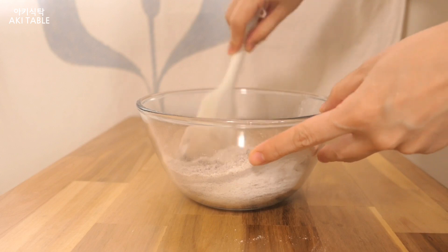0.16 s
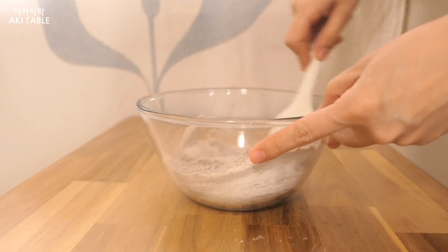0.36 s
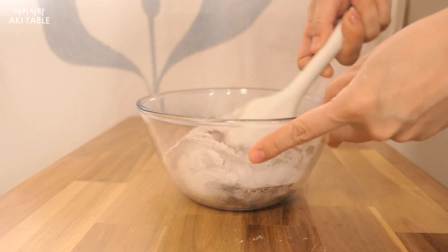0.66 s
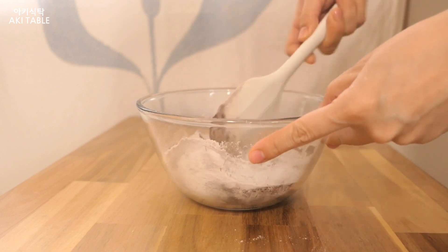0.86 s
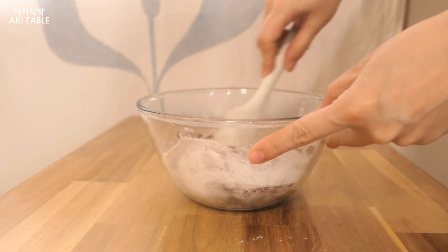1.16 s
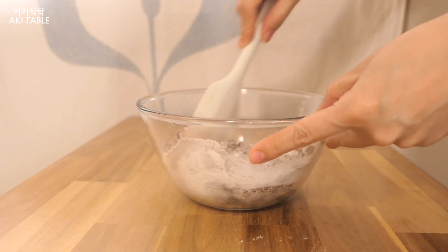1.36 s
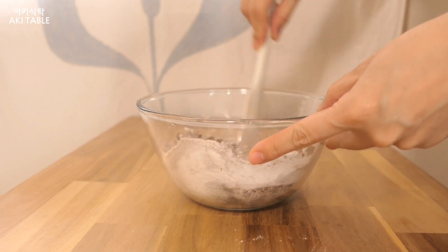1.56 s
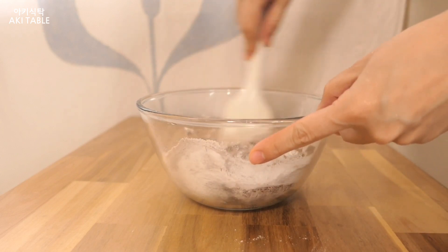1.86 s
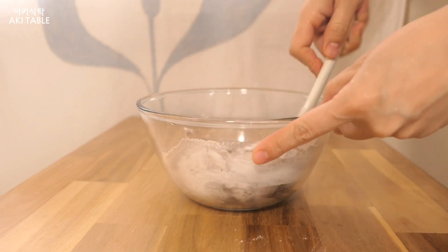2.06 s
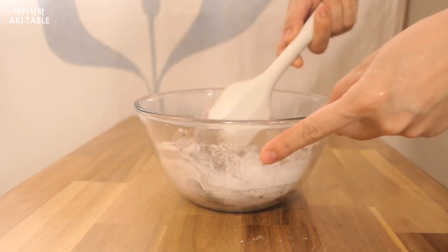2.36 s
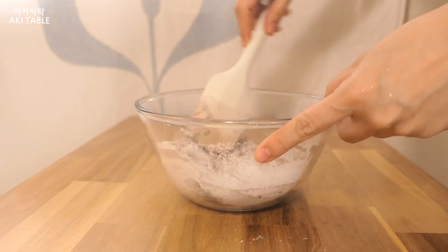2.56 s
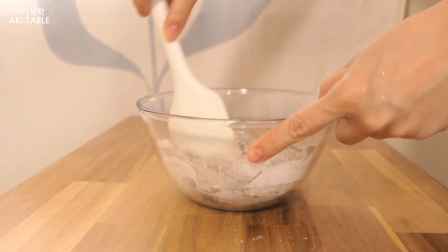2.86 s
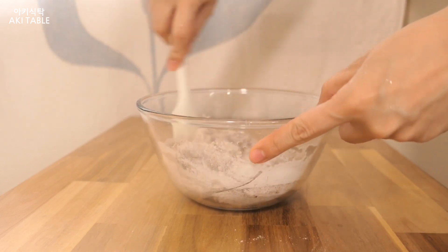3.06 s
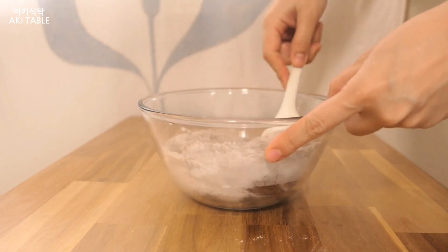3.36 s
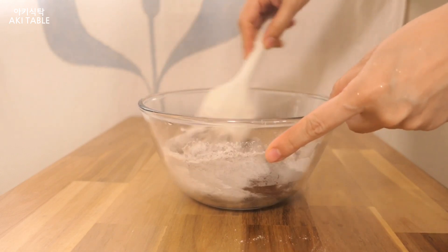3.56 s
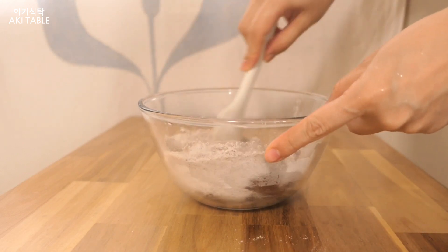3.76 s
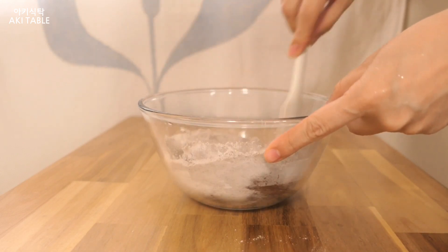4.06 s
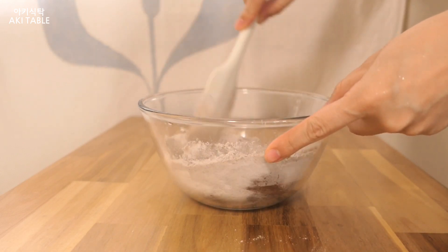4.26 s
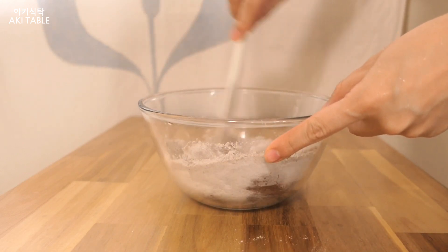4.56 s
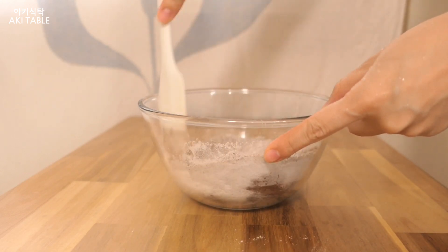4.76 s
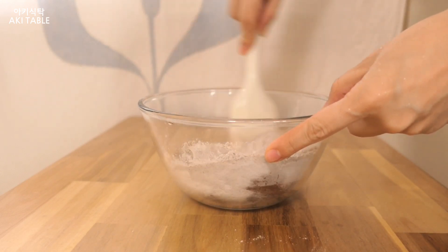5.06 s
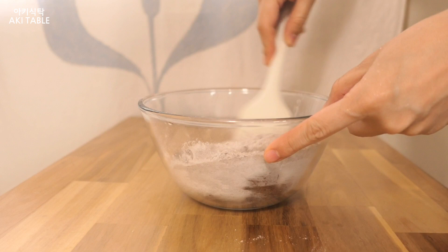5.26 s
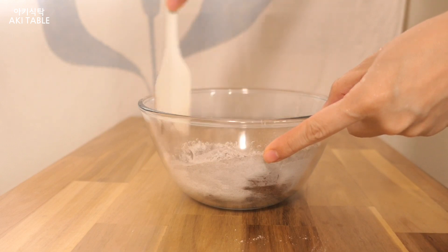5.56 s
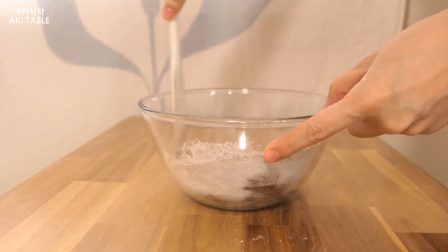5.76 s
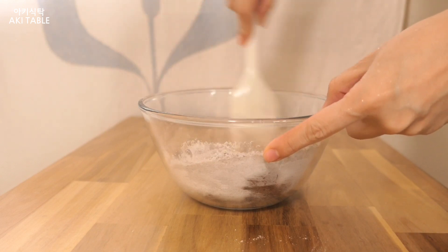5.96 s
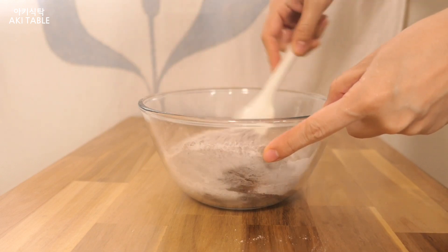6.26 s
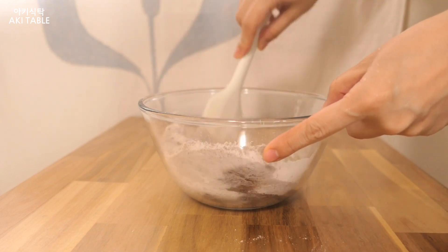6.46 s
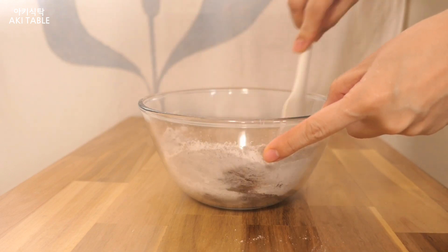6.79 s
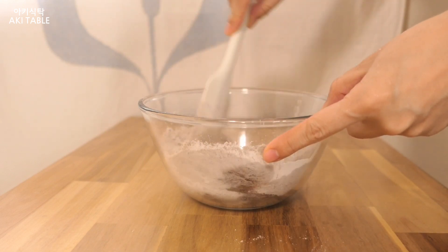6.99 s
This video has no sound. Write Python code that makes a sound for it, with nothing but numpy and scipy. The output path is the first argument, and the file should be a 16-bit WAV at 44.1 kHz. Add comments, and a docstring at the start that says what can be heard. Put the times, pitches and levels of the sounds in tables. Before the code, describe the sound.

A flexible blade pushes powder around a glass bowl on a wooden table, heard closely in stereo with short room echoes. First come a damped glassy knock and low thumps, then a cluster of rubbing scrapes and little clicks, another knock at three seconds, and a quieter spell. Brighter, dusty rasps follow towards the end, fading to gentle strokes above faint low rumble and slight hiss.

```python
"""In a small quiet kitchen, a silicone spatula folds dry powder in a glass bowl held on a wooden table.
The powder hisses and the blade rubs the glass: random tiny slips, coloured and swelling with each stroke.
Now and then the bowl rocks and knocks on the wood: sums of dying tones, kept short and hollow by a hand.
Small snaps and clicks stand out, and a low room rumble, made of coloured noise, lies under it all."""
import sys
import numpy as np
from scipy import signal
from scipy.fft import rfft, irfft
from scipy.io import wavfile

SR = 44100
rng = np.random.default_rng(int(sys.argv[2]) if len(sys.argv) > 2 else 0)


def pcm_store(signal):
    """Save signal as 16-bit PCM."""
    levels = np.round(np.clip(np.atleast_2d(signal), -1, 1) * 32767)
    wavfile.write(sys.argv[1], SR, levels.astype(np.int16).T)


N = 314433
TIME = np.arange(N) / SR  # seconds
RING_TIME = TIME[:SR // 2]  # the half second given to each struck sound

# All levels in dB are relative: the mix adds its own gains.
# The blade sweeps through the powder. Each row: moment of fastest motion in seconds, rise in seconds,
# fall in seconds, then levels in dB of sliding powder, rubbing on glass, shove on the heap, fine dust.
STROKES = [(0.13, 0.14, 0.12, -82, -75, -53, -84), (0.32, 0.084, 0.17, -75, -65.5, -60, -73),
           (1.10, 0.068, 0.084, -78.5, -66.5, -56, -80), (1.401, 0.017, 0.031, -73.5, -62, -39, -79),
           (1.74, 0.14, 0.04, -77, -66.5, -53, -78), (1.852, 0.038, 0.062, -70.5, -60, -50, -84),
           (2.01, 0.13, 0.14, -77.5, -69, -59.5, -73), (2.51, 0.044, 0.057, -80, -83, -63, -88),
           (2.83, 0.094, 0.17, -75.5, -72, -57, -75), (3.11, 0.022, 0.093, -70.5, -57, -46, -71),
           (3.64, 0.088, 0.074, -76, -69, -57, -75), (4.04, 0.063, 0.075, -84, -74, -54.5, -78),
           (4.33, 0.051, 0.12, -90, -79, -60, -78), (4.685, 0.043, 0.029, -82, -72, -56, -64),
           (4.785, 0.078, 0.071, -69.5, -75, -68, -65), (4.925, 0.033, 0.023, -67.5, -85, -63, -69),
           (4.965, 0.022, .03, -69, -68, -57.5, -70), (5.03, 0.15, 0.068, -74, -70.5, -53.5, -74),
           (5.645, 0.093, 0.032, -70.5, -81, -66, -65), (5.72, 0.046, 0.047, -67, -81, -68, -67),
           (5.82, 0.043, 0.02, -68, -77, -56, -68), (5.874, 0.05, 0.11, -69, -92, -51, -66),
           (6.04, 0.062, 0.093, -77, -72, -51, -82), (6.40, 0.026, 0.094, -75.5, -73, -55, -85),
           (6.74, 0.042, 0.044, -83, -75, -54.5, -86), (7.12, 0.066, 0.1, -82, -75.5, -53.5, -80)]
# The blade rasps along the wall; near 7.9 kHz the glass sings, above 12 kHz fine dust fizzes.
# Each row: moment of firmest contact in seconds, rise in seconds, fall in seconds, level in dB,
# resonance in Hz, width of one filter pass in Hz, glide in octaves per second.
RASPS = [(1.9, 0.023, .025, -71.5, 3000, 2000, -2), (1.845, 0.031, 0.031, -64, 2400, 1600, -8),
         (2.92, 0.032, 0.028, -71.5, 2450, 1400, -2), (5.2, .025, 0.03, -76, 3200, 1300, -1),
         (4.775, 0.064, 0.042, -76, 2860, 1200, -3), (4.79, .08, 0.09, -71.5, 7950, 300, 0.5),
         (4.77, 0.073, 0.28, -74, 13400, 3800, -1), (4.917, .009, 0.014, -66, 6400, 1800, 2),
         (4.955, 0.013, .025, -65.5, 5900, 1200, 0), (4.975, 0.034, 0.12, -68.5, 2900, 1300, -3),
         (5.65, .05, .04, -72, 7900, 260, 0.5), (5.72, 0.086, 0.026, -72, 12000, 4800, 0),
         (5.87, 0.065, .13, -76, 12700, 3200, 0), (5.66, 0.1, 0.15, -75, 1420, 74, 0),
         (6.2, 0.058, 0.037, -79, 3100, 600, 1), (5.745, .08, .06, -78.5, 3920, 140, 0),
         (5.74, 0.047, 0.064, -80, 2520, 170, -0.5), (5.868, .018, 0.016, -65, 5560, 1200, -3),
         (5.90, 0.035, .04, -69, 8000, 298, -0.5), (5.885, 0.034, 0.063, -67, 3160, 1200, -1),
         (5.885, 0.025, .05, -61.5, 550, 240, -2), (6.04, 0.033, 0.027, -60, 660, 370, 0),
         (5.995, 0.035, 0.1, -71.5, 2350, 1100, -0.5), (6.17, 0.07, 0.14, -84, 2400, 760, -1),
         (6.40, 0.027, 0.04, -74, 3300, 940, -8)]
# Colours of the sliding powder, fine dust, rubbing blade, cracking crumbs and shoved heap.
# Each row: frequency in Hz, level in dB per Hz.
POWDER_COLOUR = [(1000, -41), (2500, 2.5), (3700, -2.5), (4300, -2.5), (4700, -19), (5100, 5), (7000, 4),
                 (9500, 0.5), (12000, -11), (15000, -21)]
DUST_COLOUR = [(2000, -32), (5000, -13), (7000, -4.5), (8000, -1), (10000, 4), (13000, -8), (15000, -8)]
RUB_COLOUR = [(500, -8.5), (830, 7), (1200, -1), (1550, 5.5), (1900, -1), (2450, -5.5), (3300, -16),
              (4600, -20.5), (8000, -35)]
GRIT_COLOUR = [(1200, -10), (2500, 1), (3800, 6), (4600, 0), (6000, -6), (9000, -7), (13000, -3),
               (15000, -13)]
HEAP_COLOUR = [(60, -39), (130, 10), (220, 1.5), (280, 15), (380, 4.5), (520, 2), (640, -9), (820, -9),
               (1200, -22), (2500, -48)]
# The bowl knocks on the table. Each row: start in seconds, table thud in dB, bowl ring in dB,
# contact hardness as the ring's upper limit in Hz, glass click in dB, damping by the hand (1 = usual).
KNOCKS = [(0.24, -35, -47, 703, -61.5, 0.87), (0.3230, -26.5, -22.5, 940, -49.5, 1.04),
          (0.3903, -39, -1.5, 6060, -39, 1.07), (0.3971, -49, -13, 960, -58, 3.7),
          (1.0954, -18, -16, 192, -72, 1), (1.3767, -17, -11.5, 215, -73, 1.02),
          (1.3946, -28, -15.5, 360, -51, 1.53), (3.095, -47, -35, 202, -75, 2.5),
          (3.0976, -22, -11, 780, -38.5, 1.55), (3.635, -41, -38, 500, -66, 0.99),
          (3.99, -41, -40, 503, -73, 1.2), (5.041, -68, -36, 700, -75, 1.45),
          (5.492, -45.5, -32.5, 700, -68, 0.89)]
# Small snaps of the blade or cracking crumbs; near 3.099 s the bowl's glass clicks in a knock.
# Each row: start in seconds, level in dB, centre of the snap's colour in Hz.
TICKS = [(0.1110, -46.5, 7160), (1.384, -47, 1990), (1.711, -48, 3700), (1.747, -49, 10900),
         (1.824, -46, 2800), (1.84, -45, 2430), (1.861, -49, 5540), (1.8725, -37, 1750),
         (1.8746, -42, 2200), (1.879, -39, 1740), (2.017, -52, 10500), (2.542, -44.5, 3320),
         (2.545, -54, 7000), (3.0990, -38.5, 8700), (3.0996, -42, 2600), (3.9003, -52.5, 8640),
         (5.251, -58, 12000), (5.488, -50, 2600), (6.215, -58, 12000)]
# Tones of the table top, of the bowl standing on it, and of the glass wall.
# Each row: frequency in Hz, level in dB, time to fade by 60 dB in seconds at damping 1.
TABLE_MODES = [(99, -35, 0.061), (140, -13, 0.091), (157.5, -6.5, 0.13), (210.6, -20, 0.22)]
BOWL_MODES = [(174, -15.5, 0.058), (256, -28, 0.065), (280.7, -13.5, 0.25), (319, -28.5, 0.32),
              (357, -26.5, 0.13), (394, -13, 0.061), (434, -22, 0.059), (566, -21.5, 0.042),
              (691, -19, 0.04), (811, -14.5, 0.034), (890, -26, 0.03), (1103, -22, 0.037),
              (1144, -21, 0.03), (1665, -19.5, 0.013), (1880, -21, 0.016), (2165, -30, 0.017),
              (2525, -24.5, 0.012), (2860, -30.5, 0.011), (3400, -33.5, 0.0077)]
GLASS_MODES = [(1610, -8, 0.015), (1900, -6, 0.014), (2170, -4.5, 0.0092), (2570, -10.5, 0.016),
               (3500, -10, 0.0067), (4950, -23, 0.021), (5950, -29, 0.018), (8000, -21, 0.028),
               (8800, -25, 0.015), (8900, -24, 0.068), (11300, -25, .045)]
# How fast the kitchen's echoes die. Each row: frequency in Hz, time to fade by 60 dB in seconds.
ROOM_FADE = [(100, 0.4), (280, 0.26), (600, 0.4), (1400, 0.41), (2700, 0.41), (5000, 0.12), (12000, 0.38)]
# How the kitchen colours its echoes. Each row: frequency in Hz, gain in dB.
ROOM_COLOUR = [(80, -11.5), (170, 0.5), (270, -2), (350, 1.5), (510, 1.5), (660, 0.5), (1000, -0.5),
               (2500, -2), (5000, 9), (12000, -5)]
# Colour of the background. Each row: frequency in Hz, level in dB per Hz.
AMBIENT_COLOUR = [(20, -26), (45, -19), (80, -13), (115, 2), (210, 0), (300, -4.5), (480, -8), (620, -11.5),
                  (900, -11), (1300, -17.5), (2500, -27.5), (4600, -34.5), (5600, -29), (15000, -36.5)]
# Resonances of the room's rumble. Each row: frequency in Hz, width in Hz, boost in dB (negative = dip).
RUMBLE = [(71, 14, 8), (113.7, 6.2, 7.5), (149, 13.3, 6.5), (185, 6, -5), (261, 13.8, 10), (286, 14, 3),
          (358, 22.5, 7), (553, 14, 5.5), (772, 23, 2), (892, 23, 8)]
# How alike left and right begin. Each row: frequency in Hz, likeness (1 = same, -1 = opposite).
LIKENESS = [(40, 0.0), (80, 0.15), (120, 0.4), (220, 0.25), (400, -0.17), (700, -0.32), (1400, -0.28),
            (3100, -0.24), (6800, 0.53), (15000, 0.49)]


def stirring():
    """The blade's sounds bounce about in the bowl, while the heap's shove is heard without those echoes."""
    blade = amp(4.5) * powder() + amp(-1.5) * dust() + rubbing() + amp(3.0) * rasp()
    return in_bowl(blade, echo_db=-15.5) + amp(-0.5) * heap()


def powder():
    """Thousands of grains slide each second, blending into a fluttering hiss."""
    hiss = colour(grains(per_s=6000, spread_db=2.0), POWDER_COLOUR)
    return hiss * effort(drag_db=-100, column=3) * flutter(per_s=120, depth_db=1.7)


def dust():
    """Fine dust fizzes on the glass, higher in pitch than the powder."""
    fizz = colour(grains(per_s=6000, spread_db=2.0), DUST_COLOUR)
    return fizz * effort(drag_db=-82, column=6) * flutter(per_s=59, depth_db=0.3)


def rubbing():
    """The blade sticks and slips on the glass, and crumbs crack under the same pressure."""
    pressing = effort(drag_db=-72.5, column=4)
    rub = colour(grains(per_s=3000, spread_db=0.0), RUB_COLOUR) * flutter(per_s=36, depth_db=3.0)
    grit = colour(grains(per_s=440, spread_db=0.5), GRIT_COLOUR)
    return pressing * (amp(5.5) * rub + amp(-11) * grit)


def rasp():
    """Fine slips drive a resonance, new for each row: the rasping blade, singing glass or fizzing dust."""
    slips = grains(per_s=7900, spread_db=4.5)
    slips = slips + 0.5 * slips[::-1]  # each side also hears some of the other
    out = np.zeros((2, N))
    for peak, rise, fall, db, hz, width, glide in RASPS:
        near = abs(TIME - peak) < 0.5
        octaves = np.clip(glide * (TIME[near] - peak), -0.5, 0.5)
        sound = resonate(slips[:, near], hz * 2 ** octaves, width)
        out[:, near] += amp(db) * swell(peak, rise, fall)[near] * sound
    return out * flutter(per_s=29, depth_db=2.0)


def heap():
    """The blade shoves the heap against the bowl, a low scuffle."""
    scuffle = colour(grains(per_s=900, spread_db=0.5), HEAP_COLOUR)
    return scuffle * effort(drag_db=-59.5, column=5) * flutter(per_s=13, depth_db=2.5)


def effort(drag_db, column):
    """Gain of one part of the stirring: every stroke swells out of a light drag."""
    strokes = sum((amp(row[column]) * swell(*row[:3])) ** 2 for row in STROKES)
    drag = amp(drag_db - 1.3 * TIME)  # eases by 1.3 dB per second as the powder loosens
    return np.sqrt(strokes + drag ** 2)


def swell(peak, rise, fall):
    """The sound gathers strength up to the peak, then dies down: a pointed swell."""
    t = TIME - peak
    return np.exp(-abs(t) / np.where(t < 0, rise, fall))


def in_bowl(x, echo_db):
    """Echoes between the bowl's walls and the table comb the sound of the blade."""
    count = 12
    delays = rng.uniform(0.00054, 0.0093, count)  # seconds
    signs = rng.choice([-1, 1], count)
    out = x.copy()
    for delay, sign in zip(delays, signs):
        lag = round(delay * SR)
        out[:, lag:] += sign * amp(echo_db) * x[:, :N - lag]
    return out / np.sqrt(1 + count * amp(echo_db) ** 2)


def centred(x, width):
    """A small source close in front reaches both sides almost alike."""
    mid = x.mean(0)
    return mid + width * (x - mid)


def knocks():
    """The rocking bowl thumps the table, rings as the hand allows, and clicks where glass meets wood."""
    out = np.zeros(N)
    for start, thud_db, ring_db, hard_hz, click_db, damping in KNOCKS:
        thud = soften(ring(TABLE_MODES, lag=0.0004, damping=damping), hz=393, order=4)
        bowl = radiate(ring(BOWL_MODES, lag=0.000938, damping=damping), hz=188)
        glass = click(crack=0.46, length=0.0012, top_hz=8240)
        add(out, start, amp(thud_db) * radiate(thud, hz=95))
        add(out, start + 0.00027, amp(ring_db) * soften(bowl, hard_hz))
        add(out, start + 0.001254, amp(click_db) * glass)
    return out


def ticks():
    """Small snaps, cracks and clicks set off the glass wall, each with a colour of its own."""
    out = np.zeros(N)
    for start, db, hz in TICKS:
        snap = click(crack=0.83, length=0.0033, top_hz=11600)
        spot = signal.lfilter(*signal.iirpeak(hz, 2, fs=SR), snap)
        add(out, start, amp(db) * (0.4 * spot + 0.11 * snap))
    return out


def click(crack, length, top_hz):
    """A brief crack of grit, fading over length seconds, with the short ring of the glass wall."""
    noise = rng.standard_normal(len(RING_TIME)) * np.exp(-RING_TIME / length)
    grit = radiate(soften(noise, top_hz), hz=567)
    return 1.42 * ring(GLASS_MODES, lag=0.00026) + crack * grit


def ring(modes, lag, damping=1):
    """Dying tones; bending waves carry the treble first (lag: seconds of delay at 1 kHz)."""
    out = np.zeros(len(RING_TIME))
    for hz, db, fade in modes:
        t = np.maximum(RING_TIME - lag * np.sqrt(1000 / hz), 0)
        decay = 10 ** (-3 * t * damping / fade)
        out += amp(db) * decay * np.sin(2 * np.pi * hz * t)
    return out


def off_table(x, echo_db, delay):
    """The table top throws a knock back a moment later, with opposite sign on the two sides."""
    lag = round(delay * SR)
    echo = amp(echo_db) * np.concatenate([np.zeros(lag), x])[:N]
    return np.array([echo, -echo])


def kitchen(x, wet_db, width, build):
    """Dense reflections that swell within milliseconds and die band by band."""
    taps = rng.choice([-1., 1.], (2, SR)) * (rng.random((2, SR)) < 0.5)
    taps *= 1 - np.exp(-TIME[:SR] / build)
    hz, t, bands = signal.stft(taps, SR, nperseg=512)
    decay = 10 ** (-3 * t / read(ROOM_FADE, hz)[:, None])
    bands = bands * amp(read(ROOM_COLOUR, hz))[:, None] * decay
    mid, side = signal.istft(bands, SR, nperseg=512)[1]
    tail = np.array([mid + width * side, mid - width * side]) / np.linalg.norm(mid)
    return x + amp(wet_db) * signal.fftconvolve(x[None], tail, axes=1)[:, :N]


def ambience():
    """Steady low rumble of the room, with faint hiss; its resonances reach both sides alike."""
    mid, side = rng.standard_normal((2, N))
    return amp(-56.5) * colour(np.array([boost(mid, RUMBLE), side]), AMBIENT_COLOUR)


def boost(x, peaks):
    """Lifts or dips narrow resonances in a broad sound."""
    hz = np.fft.rfftfreq(N, 1 / SR)
    gain_db = sum(db / (1 + (2 * (hz - centre) / width) ** 2) for centre, width, db in peaks)
    return irfft(rfft(x) * amp(gain_db), N)


def grains(per_s, spread_db):
    """Two random trains of tiny slips; a wider spread makes a few much larger than the rest."""
    size = amp(spread_db * np.minimum(rng.exponential(1, (2, N)), 4))
    happens = rng.random((2, N)) < per_s / SR
    return unit(size * rng.standard_normal((2, N)) * happens)


def flutter(per_s, depth_db):
    """A gain that wanders at random, heading for a new value per_s times a second."""
    knots = rng.standard_normal(N // 100)
    return amp(depth_db * np.interp(TIME * per_s, np.arange(len(knots)), knots))


def colour(pair, spectrum):
    """Two unrelated signals become a partly alike stereo pair with this spectrum."""
    hz = np.fft.rfftfreq(N, 1 / SR)
    mid, side = rfft(pair) * amp(read(spectrum, hz))
    alike = read(LIKENESS, hz)
    mid, side = mid * np.sqrt(1 + alike), side * np.sqrt(1 - alike)
    return unit(irfft(np.array([mid + side, mid - side]), N))


def resonate(x, hz, width):
    """A resonance that follows the curve hz: shift it down to zero, smooth twice, shift back."""
    turn = np.exp(2j * np.pi * np.cumsum(hz) / SR)
    keep = np.exp(-np.pi * width / SR)
    low = x / turn
    for _ in range(2):
        low = signal.lfilter([1 - keep], [1, -keep], low)
    return unit((turn * low).real)


def radiate(x, hz):
    """A small body pushes little air at low frequencies."""
    return signal.lfilter(*signal.butter(3, hz, "high", fs=SR), x)


def soften(x, hz, order=2):
    """A softer, longer contact leaves out the high frequencies."""
    return signal.lfilter(*signal.butter(order, hz, fs=SR), x)


def read(points, hz):
    """A curve joined by straight lines over log frequency."""
    f, value = np.transpose(points)
    return np.interp(np.log(hz + 1), np.log(f + 1), value)


def add(mix, start, sound):
    """Lays a sound into the mix at start seconds, cut off at the end."""
    part = mix[round(start * SR):][:len(sound)]
    part += sound[:len(part)]


def amp(db):
    """Decibels to a plain gain."""
    return 10 ** (np.asarray(db) / 20)


def unit(x):
    """Scales a sound to an average (RMS) level of 1."""
    return x / np.sqrt(np.mean(x ** 2) + 1e-20)


def scene():
    """Knocks ring out into the kitchen over the soft stirring and the room's rumble."""
    blows = knocks() + ticks()
    struck = kitchen(blows, wet_db=-10.0, width=0.35, build=0.0087)
    struck = struck + off_table(blows, echo_db=-16.5, delay=0.0008)
    return centred(stirring(), width=0.45) + struck + ambience()


def record(dry):
    """A steep low-pass ends the treble at 15350 Hz."""
    low_pass = signal.firwin(401, 15350, window=("kaiser", 8), fs=SR)
    return signal.oaconvolve(dry, low_pass[None], "same")


dry = scene()
out = record(dry)
pcm_store(out)
```